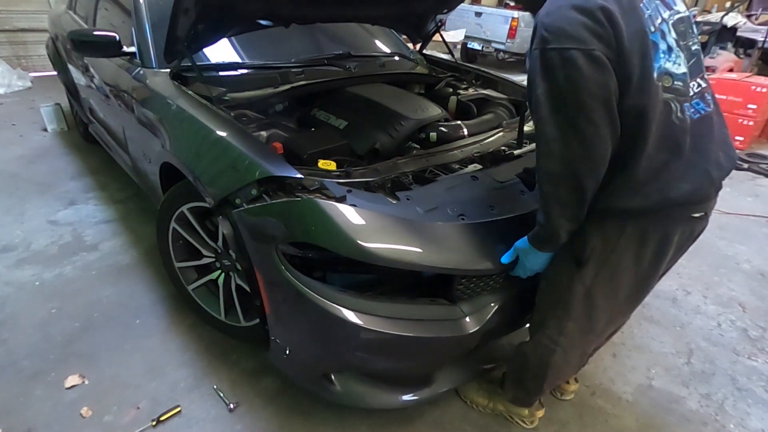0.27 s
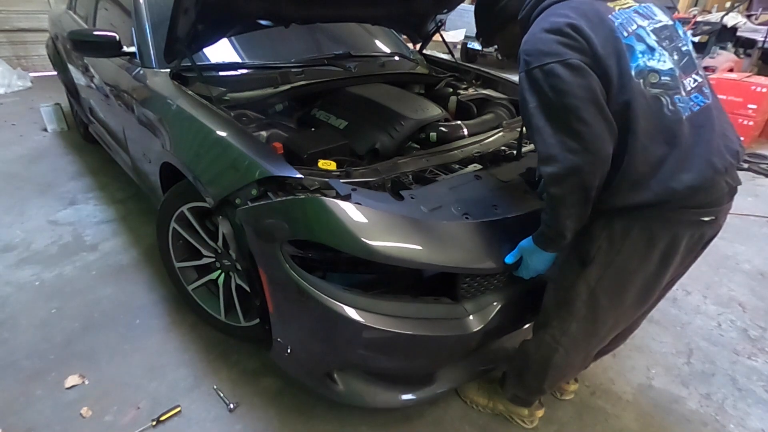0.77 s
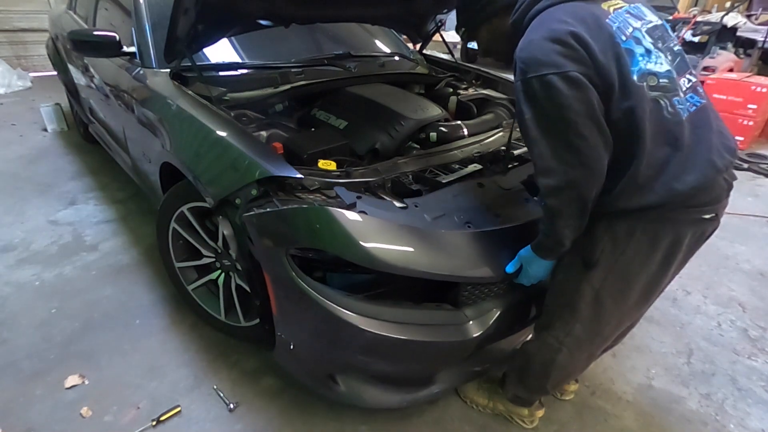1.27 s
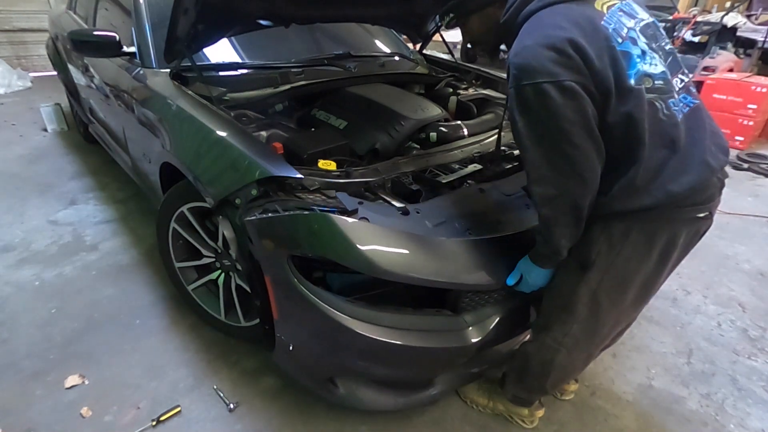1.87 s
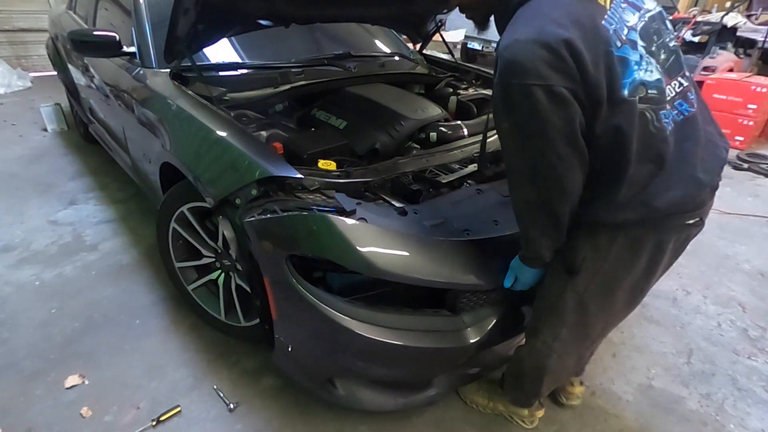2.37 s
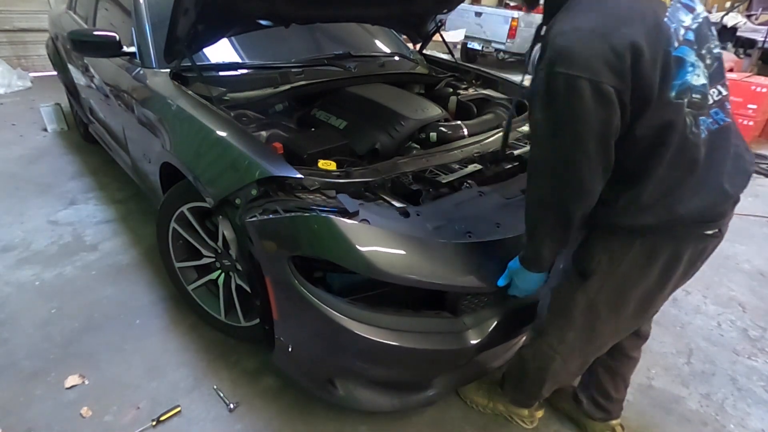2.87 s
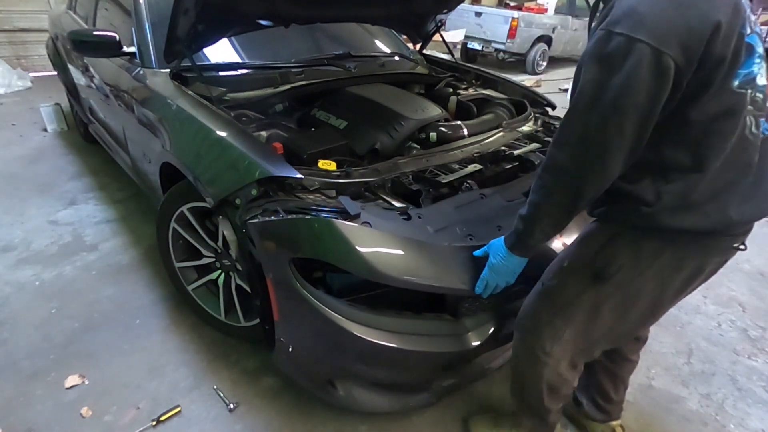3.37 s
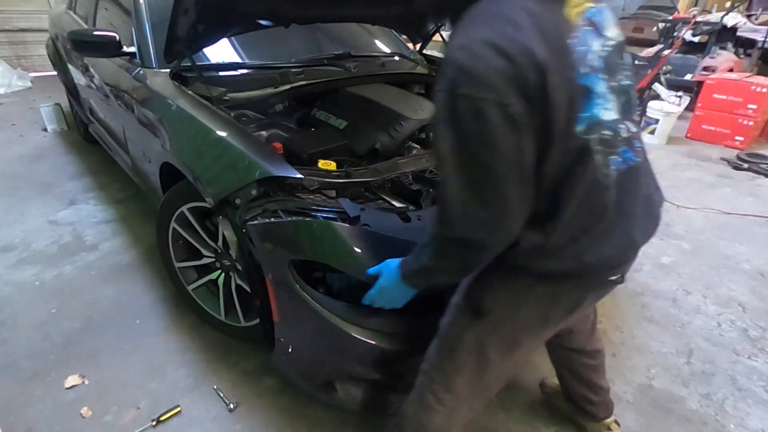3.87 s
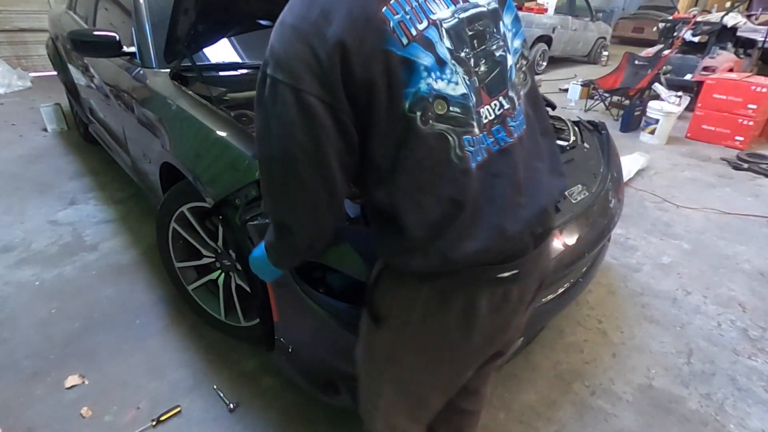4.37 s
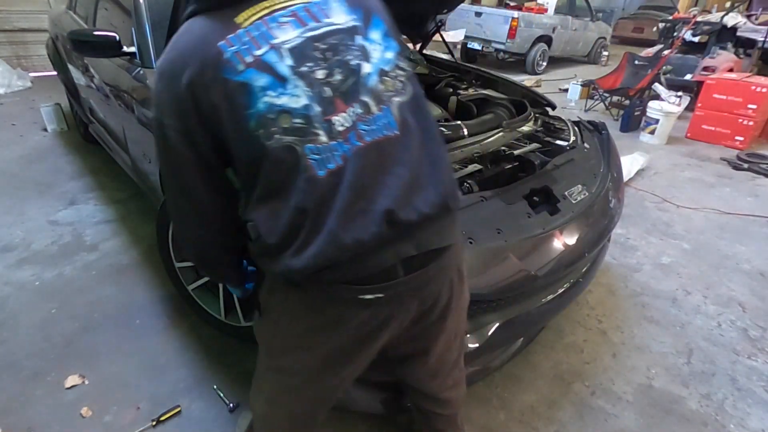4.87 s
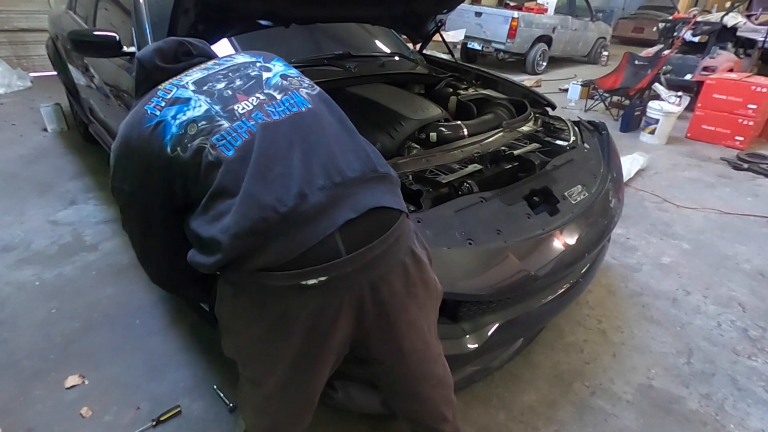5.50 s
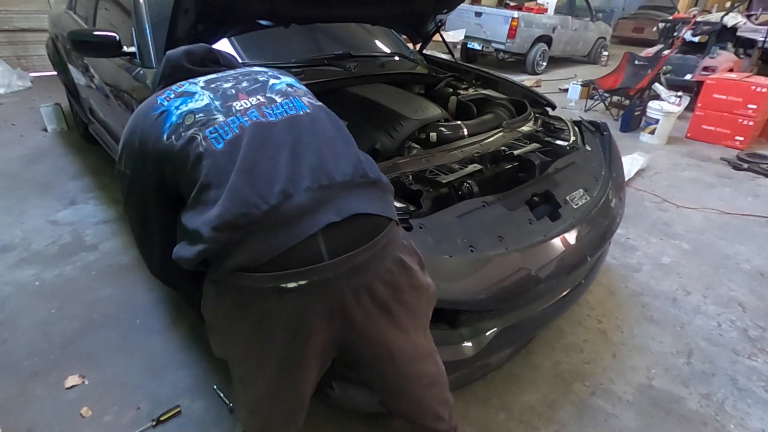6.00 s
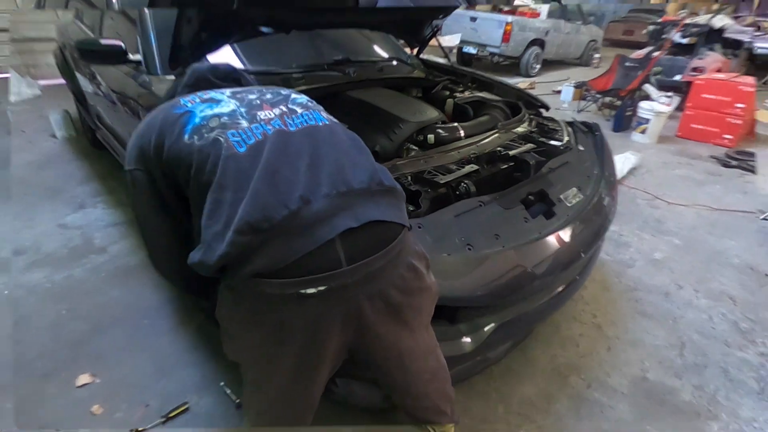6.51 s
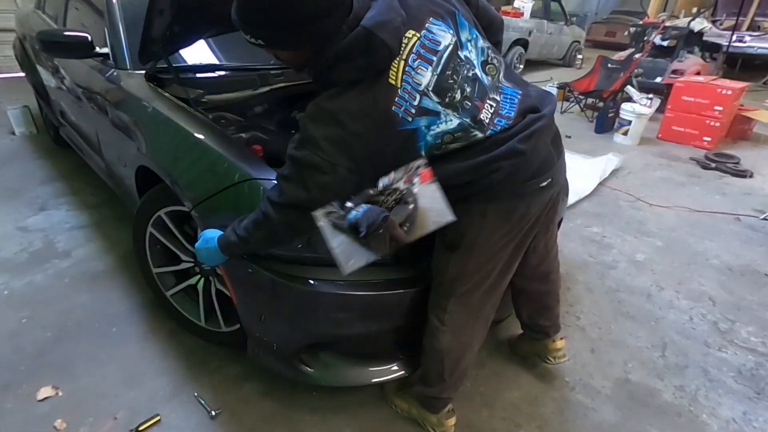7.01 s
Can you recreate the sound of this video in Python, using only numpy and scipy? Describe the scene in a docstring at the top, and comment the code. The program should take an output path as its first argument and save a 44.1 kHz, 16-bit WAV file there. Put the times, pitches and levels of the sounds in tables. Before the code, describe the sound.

A plastic bumper cover is worked off a car by hand in a concrete garage, over a low ventilation rumble. A shoe scuffs, the plastic rubs with faint squeaks, and knocks ring the panel. Two sharp cracks of snapping clips overload the microphone on the right. A hard knock follows, then more rubbing, further cracks and a run of knocks. Shoes scuff and cloth swishes before the last knocks.

```python
"""Over a ventilation rumble in a concrete garage, a plastic bumper cover is worked off a car by hand.
First a shoe scuffs, plastic rubs and squeals by friction, and knocks and snapping clips ring the panel.
At 2.2 and 2.9 s sharp cracks overload the camera's right microphone, and its gain control ducks.
A hard knock follows at 3.6 s, then more rubbing, more cracks from 5.2 to 5.6 s and a run of knocks.
Near 7 s shoes scuff and ribbed cloth swishes before the last knocks."""
import sys
import numpy as np
from scipy import signal
from scipy.fft import rfft, irfft
from scipy.io import wavfile

SR = 44100
rng = np.random.default_rng(int(sys.argv[2]) if len(sys.argv) > 2 else 0)


def inscribe(sig):
    """Save sig as 16-bit PCM at rate SR to the path in sys.argv[1].

    A 1-D sig is mono; a 2-D sig holds one channel per row.
    Samples are clipped to [-1, 1] before scaling.
    """
    pcm = np.round(np.clip(np.atleast_2d(sig).T, -1, 1) * 32767)
    wavfile.write(sys.argv[1], SR, pcm.astype(np.int16))


N = 319725
TIME = np.arange(N) / SR

# Knocks and snapping clips. Each row: start in seconds, relative level at 1 kHz in dB,
# tilt in dB per octave, pitch of the struck spot in Hz, relative click level in dB.
KNOCKS = [(.488, -81.5, -0.5, 2730, -41), (.684, -60, -2, 570, -19), (1.062, -76, -0.5, 496, -60),
          (1.198, -48, -10, 1780, -32), (1.38, -58, -9.5, 235, -58), (1.453, -61, -14, 520, -47),
          (1.49, -58, -11.5, 1510, -56), (1.53, -85, -2.5, 4770, -43), (1.909, -56, -7.5, 497, -45),
          (2.374, -62, -8.5, 305, -53), (3.411, -51.5, -9.5, 706, -45.5), (3.621, -50, -7, 1200, -50.5),
          (3.6325, -35.5, -5, 1570, -12), (3.647, -35, -7.5, 1567, -35), (5.821, -66, -6, 1050, -49),
          (5.9408, -33.5, -9, 1830, -19), (5.975, -40, -8.5, 410, -32), (5.997, -44.5, -9, 343, -43),
          (6.018, -47.5, -7.5, 248, -27), (6.063, -54, -5, 280, -19.5), (7.175, -60.5, -5.5, 1970, -30),
          (7.194, -44.5, -7, 645, -27), (7.223, -48.5, -5.5, 340, -20.5)]
# Shoe and sleeve scuffs. Each row: start in seconds, relative level at 1 kHz in dB, tilt in dB per octave.
SCUFFS = [(0.167, -54.5, -3.5), (4.375, -50, -2), (4.434, -45.5, -7), (4.7586, -50.5, -0.2),
          (6.772, -56.5, -3.5), (6.827, -56.5, -4), (6.907, -56, -7.5), (6.98, -49, -2.06)]
# Cracks at the microphone. Each row: time in seconds, relative snap and thump levels in dB,
# amplitude share of its pre-echo.
CRACKS = [(2.1893, 2.5, -4, .17), (2.8674, 4, -3.6, .18), (5.2133, -48, -28.5, .03),
          (5.2845, -15, -10.3, .04), (5.3838, -36, -21.5, .03), (5.6252, 3.5, -3.8, .18)]
# The garage's reverberation. Each row: frequency in Hz, time to fall 60 dB (t60) in seconds.
GARAGE_T60 = [(100, 0.77), (350, 0.49), (750, 0.37), (1500, 0.53), (3000, 0.67), (7000, 0.51),
              (14000, 0.081)]
# Stereo width of the contact noises. Each row: frequency in Hz, side minus mid in dB.
SOURCE_WIDTH = [(100, -20.5), (900, -29.5), (1300, -8.5), (4000, -7), (9000, -8)]
SLIDE_TILT_HZ = (720, 6060)   # the tilt of scuffs and rubs levels off outside this span


def from_db(db):
    """Amplitude grows tenfold with every 20 dB."""
    return 10 ** (np.asarray(db) / 20)


def rms_one(x):
    """Division by the root mean square gives unit power."""
    return x / np.sqrt(np.mean(x ** 2) + 1e-20)


def at_hz(points, hz):
    """Interpolation of a table along log frequency."""
    frequencies, values = np.transpose(points)
    return np.interp(np.log(hz), np.log(frequencies), values)


def cut(x, hz, kind, order=2):
    """A Butterworth filter, maximally flat in its passband."""
    return signal.sosfilt(signal.butter(order, hz, kind, fs=SR, output="sos"), x + 1e-18)


def smooth(x, seconds):
    """A first-order lag with the given time constant."""
    lag = np.exp(-1 / (SR * seconds))
    return signal.lfilter([1 - lag], [1, -lag], x)


def clicks(times, heights):
    """Ideal impulses, one sample for each event."""
    out = np.zeros(N)
    samples = np.round(np.asarray(times) * SR).astype(int)
    np.add.at(out, np.clip(samples, 0, N - 1), heights)
    return out


def fade(x, t60):
    """Exponential decay: each impulse leaves a tail of its own height."""
    return signal.lfilter([1], [1, -from_db(-60 / (t60 * SR))], x + 1e-18)


def ring(x, hz, t60):
    """A damped resonator: a unit impulse starts a sine of height 1."""
    radius, angle = from_db(-60 / (t60 * SR)), 2 * np.pi * hz / SR
    return signal.lfilter([0, np.sin(angle)], [1, -2 * radius * np.cos(angle), radius ** 2], x + 1e-18)


def drift(rate):
    """Random modulation of spread about 1, with `rate` new values a second."""
    return np.interp(TIME * rate, np.arange(N // 8), rng.standard_normal(N // 8))


def stroke(middle, length):
    """A Gaussian envelope, as of a slide that speeds up and slows down."""
    return np.exp(-np.minimum((2 * (TIME - middle) / length) ** 2, 20))


def tilted(level_db, tilt_db, hz, span_hz):
    """Spectral tilt: the harder or faster a contact, the less its gain falls with each octave."""
    octaves = np.log2(np.clip(hz, *span_hz) / 1000)
    return from_db(level_db + tilt_db * octaves) / np.sqrt(1000)


def noise_bands(width, grain=1):
    """Mid-side noise in third octaves, as (centre in Hz, band); neighbours are uncorrelated."""
    edges = 25 * 2 ** (np.arange(29) / 3)
    white = rng.standard_normal((2, 2, N)) * grain * np.sqrt(SR / 2)
    for k, hz in enumerate(np.sqrt(edges[1:] * edges[:-1])):
        mid, side = cut(white[k % 2], edges[k:k + 2], "band")
        yield hz, mid + from_db(at_hz(width, hz)) * side * np.array([[1], [-1]])


def bursts(times, gain_at, colour, rise_s, body_t60, room_db, strike_db, grain_db):
    """Modal overlap: after a strike, crowded modes die away as noise; reverberation lasts longer."""
    grain = rms_one(from_db(grain_db * drift(600)))
    out = np.zeros((2, N))
    for hz, band in noise_bands(SOURCE_WIDTH, grain):
        energy = clicks(times, gain_at(hz) ** 2)
        body = fade(energy, body_t60 / 2 * (1000 / hz) ** 0.052)   # energy decays at twice the rate
        room = from_db(room_db) ** 2 * fade(energy, at_hz(GARAGE_T60, hz) / 2)
        strike = from_db(strike_db) ** 2 * hz / (hz + 1200) * fade(energy, 0.017)
        out += band * from_db(at_hz(colour, hz)) * smooth(np.sqrt(body + room + strike), rise_s)
    return out


def ventilation(level_db=-50.5, flicker_db=-4.5):
    """Broadband noise: a low rumble under a thin, wide hiss, each band fluctuating on its own."""
    # The rumble's spectrum. Each row: frequency in Hz, relative spectral density in dB.
    spectrum = [(15, -32), (25, 4), (54, 4), (154, 1.5), (207, -5.5), (264, -14), (301, -11.5),
                (543, -35.5), (790, -33.5), (952, -40), (1420, -31.5), (4040, -52), (6900, -43.5),
                (11200, -60.5), (15000, -56)]
    # The room's stereo width. Each row: frequency in Hz, side minus mid in dB.
    room_width = [(100, -23), (380, -10), (850, -6.5), (1300, 5), (4000, 8), (14000, -5)]
    air = sum(band * from_db(at_hz(spectrum, hz) + flicker_db * drift(30))
              for hz, band in noise_bands(room_width))
    return from_db(level_db) * rms_one(cut(air, 7700, "low", order=6))


def swishes(wobble=.22):
    """Periodic contact: cloth ribs zip past each other at a rough pitch that follows the arm's speed."""
    # Swishes. Each row: start and length in seconds, first and last pitch in Hz, peak level in dB.
    glides = [(6.771, 0.049, 3420, 7270, -56), (6.83, 0.007, 6370, 3200, -49),
              (6.988, 0.02, 2620, 6450, -44)]
    out = np.zeros(N)
    for start, length, start_hz, end_hz, level_db in glides:
        along = np.clip((TIME - start) / length, 0, 1)
        hz = start_hz * (end_hz / start_hz) ** along * (1 + wobble * drift(3000))
        out += from_db(level_db) * np.sin(np.pi * along) * np.sin(2 * np.pi * np.cumsum(hz) / SR)
    return out


def scuff_gain(hz):
    """The excitation spectrum of each scuff, read at one frequency."""
    _, level_db, tilt_db = np.transpose(SCUFFS)
    return tilted(level_db, tilt_db, hz, SLIDE_TILT_HZ)


def scuffs(hiss_db=3, grit_db=-8, grit_hz=4000, specks_per_s=900):
    """Brief friction of shoes and sleeves: a soft-edged hiss with specks of grit in it."""
    # A scuff's spectral envelope. Each row: frequency in Hz, gain in dB.
    colour = [(30, -25), (200, -4), (500, -5.5), (1500, -2.5), (4000, -3), (8000, 2.5), (10500, -26.5),
              (15000, -35)]
    times = np.array(SCUFFS)[:, 0]
    specks = (rng.random(N) < specks_per_s / SR) * rng.standard_normal(N)
    heights = from_db(grit_db) * scuff_gain(grit_hz) * np.sqrt(grit_hz)
    envelope = smooth(fade(clicks(times, heights), 0.11), .006)
    grit = cut(specks * envelope, [1500, 9000], "band")
    hiss = bursts(times, scuff_gain, colour, rise_s=0.011, body_t60=0.16,
                  room_db=-15.5, strike_db=-7.5, grain_db=-0.5)
    return grit + from_db(hiss_db) * hiss


def rubs(level_db=-1, grain_db=3, flicker_db=1.5, room_db=-7.5):
    """Sliding friction of plastic and cloth: a grainy hiss follows each stroke and reverberates."""
    # Strokes. Each row: middle and length in seconds, relative level at 1 kHz in dB,
    # tilt in dB per octave.
    slides = [(0.144, .11, -63.5, 0.5), (0.194, 0.068, -48, -4.5), (0.283, 0.15, -69, -2),
              (2.449, 0.097, -47.5, -8), (2.527, 0.14, -48.5, -5), (2.632, 0.15, -56, -2),
              (2.781, 0.13, -68.5, -0.5), (3.093, 0.087, -97.5, 8), (3.262, 0.13, -64.5, -1),
              (3.977, 0.24, -65.5, -2), (4.635, 0.18, -65.5, -1), (4.873, 0.2, -67, -1),
              (5.12, 0.22, -69, -2.5), (5.259, 0.13, -58, -3.5), (5.422, 0.15, -65.5, -2),
              (5.56, 0.26, -62, -6), (5.8, 0.48, -66, -4), (6.25, 0.21, -69, -2), (6.455, .08, -67, -4.5),
              (6.572, 0.2, -59, -5.5), (6.825, 0.25, -68, -6.5), (6.901, 0.043, -58.5, -1.5),
              (7.053, 0.1, -53.5, -7), (7.183, 0.091, -76.5, 4.5)]
    # A rub's spectral envelope. Each row: frequency in Hz, gain in dB.
    colour = [(30, -21), (200, 3.5), (450, -2.5), (950, -10.5), (1450, 0.5), (2000, -3.5), (2700, -3.5),
              (4500, -5.5), (7800, -4), (10500, -36), (15000, -36)]
    grain = rms_one(from_db(grain_db * drift(500)))
    _, _, stroke_db, tilt_db = np.transpose(slides)
    efforts = np.array([stroke(middle, length) ** 2 for middle, length, *_ in slides])
    out = np.zeros((2, N))
    for hz, band in noise_bands(SOURCE_WIDTH, grain):
        power = tilted(stroke_db, tilt_db, hz, SLIDE_TILT_HZ) ** 2 @ efforts
        tail = from_db(room_db) ** 2 * smooth(power, at_hz(GARAGE_T60, hz) / (2 * np.log(1000)))
        gain = from_db(level_db + at_hz(colour, hz) + flicker_db * drift(40))
        out += band * np.sqrt(power + tail) * gain
    return out


def squeals(slips_per_s=1800):
    """Stick-slip friction: irregular slips of a rubbed edge feed one resonance."""
    # Singing edges. Each row: middle and length in seconds, pitch and bandwidth in Hz, level in dB.
    edges = [(.175, .07, 1400, 250, -53), (2.5, .17, 1450, 300, -50), (2.53, .12, 2700, 1100, -53),
             (2.66, .1, 1450, 250, -59), (3.25, .14, 1400, 250, -60), (3.27, .12, 2400, 900, -61),
             (5.09, .14, 1350, 250, -70), (5.22, .24, 7550, 500, -67), (5.23, .16, 2350, 600, -62),
             (6.53, .25, 7600, 600, -69), (6.54, .25, 2500, 600, -66), (6.57, .07, 1850, 350, -58)]
    out = np.zeros(N)
    for middle, length, hz, width_hz, level_db in edges:
        slips = (rng.random(N) < slips_per_s / SR) * rng.standard_normal(N)
        resonance = rms_one(cut(slips, [hz - width_hz / 2, hz + width_hz / 2], "band"))
        out += from_db(level_db) * stroke(middle, length) * resonance
    return out


def ringing():
    """Free vibration: the panel or small parts hold a tone after a knock."""
    # Ringing tones. Each row: start in seconds, pitch in Hz, peak level in dB, t60 in seconds.
    tones = [(.491, 3200, -63, .06), (1.203, 1520, -42, .28), (1.204, 540, -42, .15),
             (1.205, 1625, -41.5, .23), (1.53, 4650, -57, .025), (1.911, 2400, -50, .04),
             (2.373, 385, -36, .16), (3.648, 1580, -42, .55), (3.649, 1503, -45, .6)]
    return sum(ring(clicks([start], from_db(level_db)), hz, t60) for start, hz, level_db, t60 in tones)


def knock_gain(hz, spot_db=8.5, spot_octaves=0.56):
    """The excitation spectrum of each knock at one frequency: a tilt, and the struck spot's hump."""
    _, level_db, tilt_db, spot_hz, _ = np.transpose(KNOCKS)
    hump_db = spot_db * np.exp(-.5 * (np.log2(hz / spot_hz) / spot_octaves) ** 2)
    return tilted(level_db + hump_db, tilt_db, hz, span_hz=(230, 5980))


def splinters(times, peak_db, splinter_db=-15):
    """Noise transients: each click frays into a few milliseconds of bright crackle."""
    spray = rng.standard_normal(N) * fade(clicks(times, from_db(peak_db + splinter_db)), t60=0.011)
    return cut(cut(spray, [1200, 6500], "band", order=1), 9000, "low", order=4)


def knocks(click_db=-17, modes_db=-7.5, shudder_db=-1):
    """Impact excitation: a direct click, the cover's clear modes and the whole panel's dense shudder."""
    # The cover's modes. Each row: frequency in Hz, relative level in dB, t60 in seconds.
    panel_modes = [(178.9, 3.5, 0.43), (318, -4.5, 0.41), (385.3, 2, 0.29), (539, -0.5, 0.26),
                   (579.5, -4, 0.34), (840, -12, 0.45), (1015, -45, .17), (1340, 4.5, 0.2),
                   (1485, -8.5, 0.31), (1644, -9, 0.22), (1680, -15.5, 0.24), (1790, -8, 0.19),
                   (2095, -20.5, 0.062), (2370, -8.5, 0.35), (3560, -13.5, 0.25), (3953, 3, .15)]
    # The shudder's spectral envelope. Each row: frequency in Hz, gain in dB.
    colour = [(30, -22.5), (80, -4), (170, -3), (270, -2), (380, -3), (520, -1), (1100, 1.5), (1550, 2.5),
              (2000, -1), (3600, 2.5), (5500, -0.5), (8000, 0), (10500, -27), (15000, -41)]
    times, *_, peak_db = np.transpose(KNOCKS)
    impulses = clicks(times, from_db(peak_db + click_db))
    contact = 4 * cut(cut(impulses, [500, 3500], "band", order=1), 9000, "low", order=4)
    modes = np.zeros(N)
    for hz, level_db, t60 in panel_modes:
        scatter_db = rng.normal(0, 1, len(times))
        strength = knock_gain(hz) * np.sqrt(hz) * from_db(level_db + modes_db + scatter_db)
        modes += ring(clicks(times, strength * rng.choice([-1, 1], len(times))), hz, t60)
    shudder = bursts(times, knock_gain, colour, rise_s=.0016, body_t60=0.21,
                     room_db=-6.5, strike_db=5.5, grain_db=1.5)
    return contact + splinters(times, peak_db) + modes + from_db(shudder_db) * shudder


def flutter(level_db=-38, lead_s=.006, length_s=.016, right_db=1.5):
    """Amplitude-modulated noise: a rough buzz swells just ahead of each crack."""
    swell = sum(from_db(snap_db) * stroke(time - lead_s, length_s) for time, snap_db, *_ in CRACKS)
    buzz = rms_one(cut(rng.standard_normal(N), [900, 1800], "band"))
    return from_db(level_db) * swell * buzz * np.array([[1], [-from_db(right_db)]])


def thumps(echo_gap_s, sink_hz=85, flip_hz=80, pop_hz=560, capsule_hz=1150, capsule_db=-4):
    """Transient response: the right diaphragm pops outward, sinks and creeps back."""
    times, snap_db, thump_db, share = np.transpose(CRACKS)
    heights = from_db(thump_db)
    kicks = clicks(times, heights) + clicks(times - echo_gap_s, -heights * share)
    push = cut(cut(kicks, sink_hz, "low", order=1), pop_hz, "low")
    swing = cut(push - 2 * cut(push, flip_hz, "low", order=1), 26, "high")
    pop = heights.max() * swing / -swing.min()
    # a faint low pre-echo swells before the thump
    early = sum(clicks(times - (k + .5) * echo_gap_s, heights * (-1) ** k * (2.3 * share) ** (k + 1))
                for k in (0, 1))
    pre_echo = signal.fftconvolve(early, np.hanning(round(echo_gap_s * SR) | 1), "same")
    # the capsule rings for a cycle or two, more so after a hard snap
    tap_heights = from_db(capsule_db + thump_db + 0.56 * (snap_db - snap_db.max()))
    taps = sum(clicks(times + echo_gap_s / 20 - k * echo_gap_s, tap_heights * share ** k)
               for k in range(3))
    return (pop + pre_echo + ring(taps, capsule_hz, t60=0.0065)) * np.array([[0], [1]])


def snaps(echo_gap_s, edge_hz=1080, dull_hz=1500, tick_db=-2):
    """Band-limited impulses, in antiphase between the channels, each after two faint, dull pre-echoes."""
    times, snap_db, _, share = np.transpose(CRACKS)
    pre_echoes = sum(clicks(times - k * echo_gap_s, from_db(snap_db) * share ** k) for k in (1, 2))
    pulses = clicks(times, from_db(snap_db)) + cut(pre_echoes, 5000, "low", order=4)
    # zero phase: the snap swells and dies symmetrically, ringing at its steep lower edge
    hz = np.fft.rfftfreq(N, 1 / SR) + 1
    shape = 1 / (1 + (edge_hz / hz) ** 14) / (1 + (hz / dull_hz) ** 2.6) / (1 + (hz / 10500) ** 6)
    snap = irfft(rfft(pulses) * shape, N) / shape.mean()
    # the hardest cracks end in a tick that both channels share
    hardest = pulses * np.abs(pulses) ** .5 / pulses.max() ** 1.5
    tick = cut(cut(hardest + .3 * pre_echoes, 1500, "high", order=1), 8500, "low", order=4)
    return snap * np.array([[1], [-1]]) - from_db(tick_db) * np.roll(tick, SR // 10000)


def cracks(echo_gap_s=.0109):
    """Common onset fuses snap and thump; two pre-echoes from the camera's processing precede them."""
    return snaps(echo_gap_s) + thumps(echo_gap_s) + flutter()


def scene():
    """Superposition: contact noises sit near the middle; the hiss and the cracks are wide."""
    return knocks() + ringing() + scuffs() + rubs() + squeals() + swishes() + ventilation() + cracks()


def record(dry):
    """Automatic gain control: overload ducks the gain, which creeps back; peaks clip, the top is cut."""
    knee_middle_db, depth_db, release_db_per_s, attack_s = -7, 15, 110, .02
    peak_db = 20 * np.log10(np.abs(dry).max(axis=0) + 1e-9)
    wanted_db = depth_db * np.clip(1.5 - peak_db / knee_middle_db, 0, 1)
    release_db = release_db_per_s * TIME
    held_db = np.maximum.accumulate(wanted_db + release_db) - release_db
    ducked = dry * from_db(-smooth(smooth(held_db, attack_s / 2), attack_s / 2))
    low_pass = signal.cheby2(12, 70, 16700, fs=SR, output="sos")
    return signal.sosfilt(low_pass, np.clip(ducked, -.95, .95))


dry = scene()
out = record(dry)
inscribe(out)
```